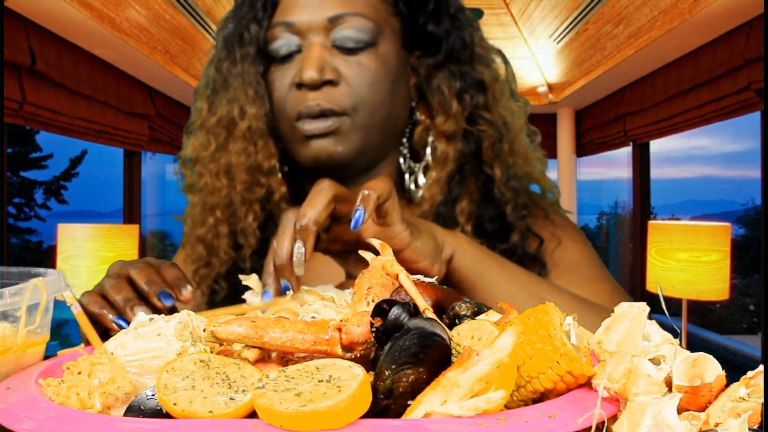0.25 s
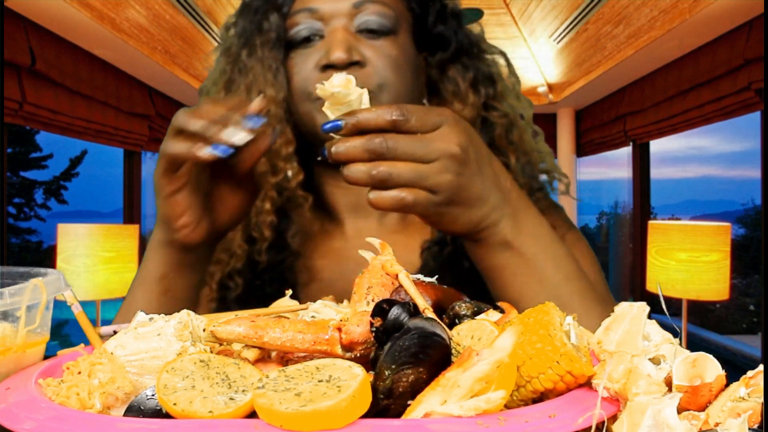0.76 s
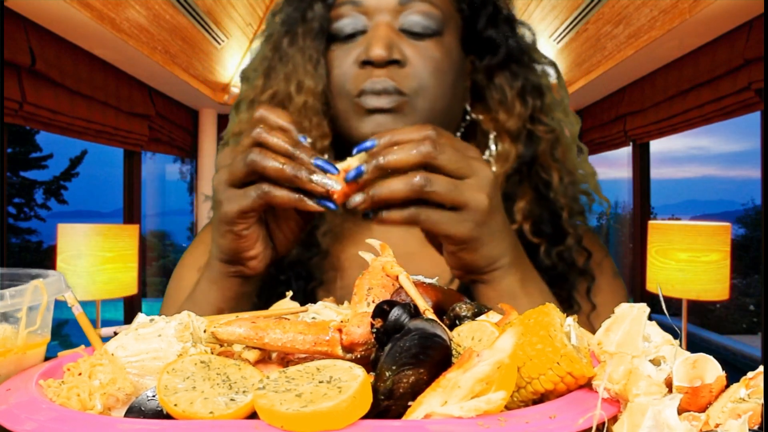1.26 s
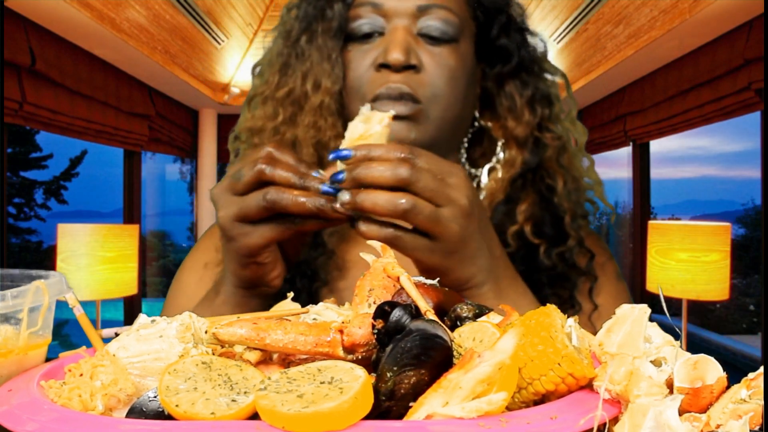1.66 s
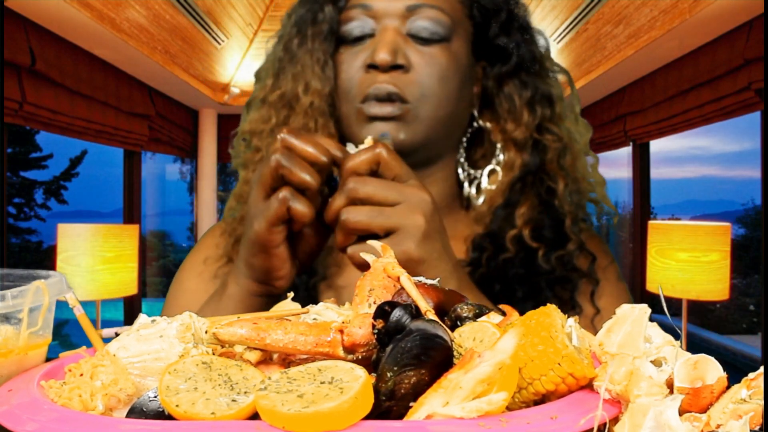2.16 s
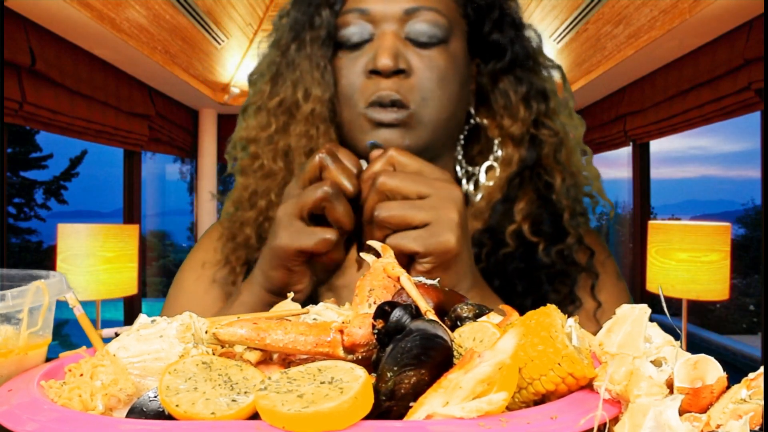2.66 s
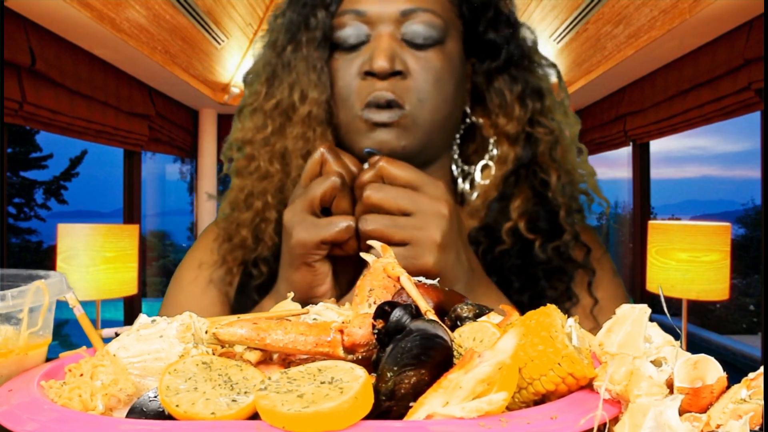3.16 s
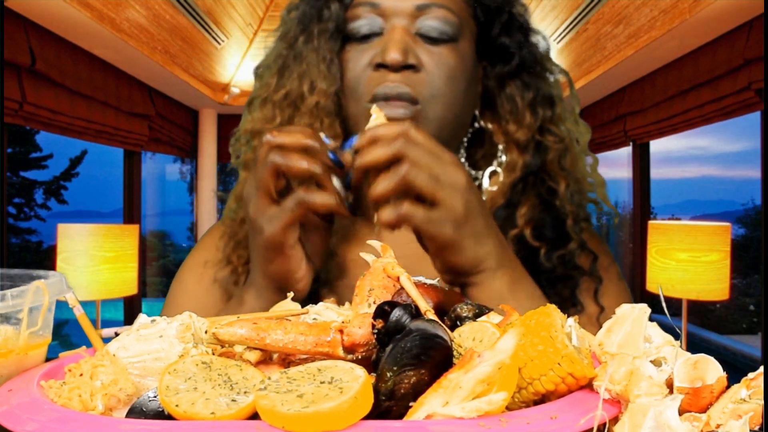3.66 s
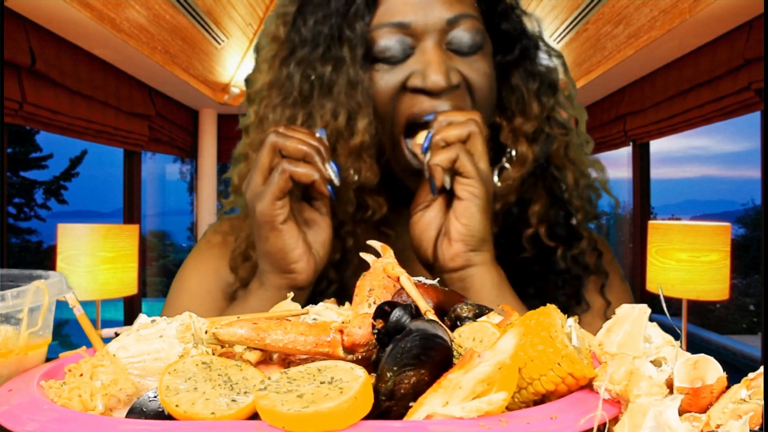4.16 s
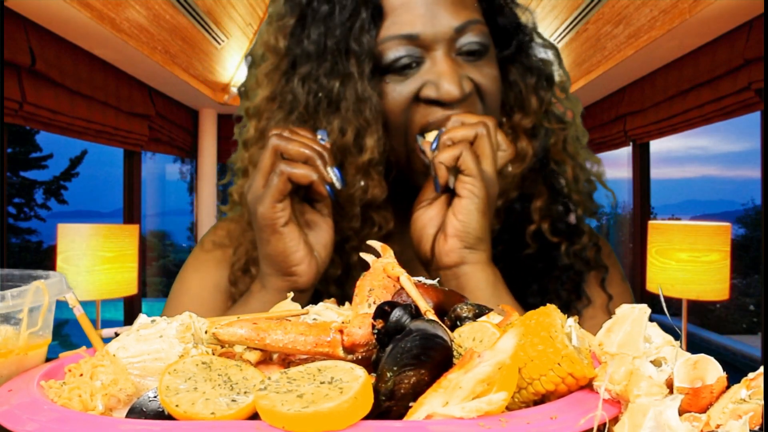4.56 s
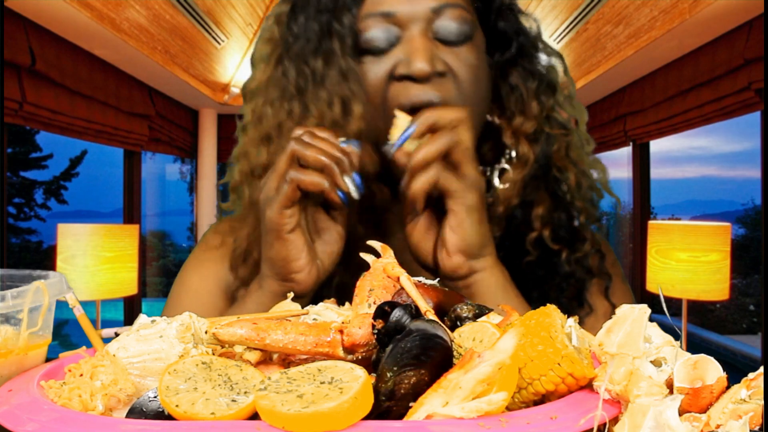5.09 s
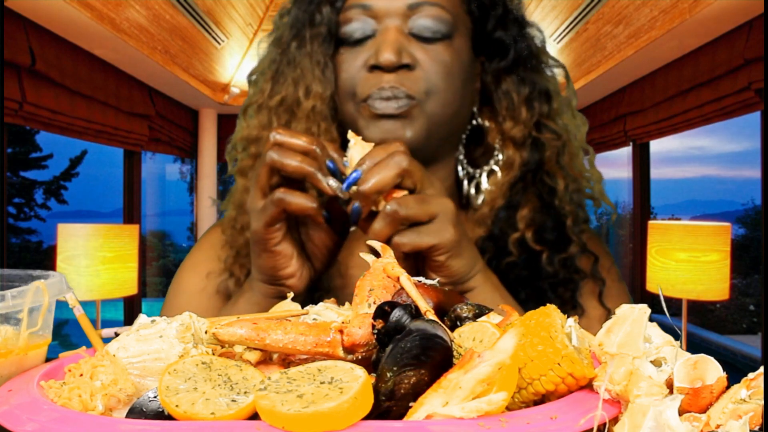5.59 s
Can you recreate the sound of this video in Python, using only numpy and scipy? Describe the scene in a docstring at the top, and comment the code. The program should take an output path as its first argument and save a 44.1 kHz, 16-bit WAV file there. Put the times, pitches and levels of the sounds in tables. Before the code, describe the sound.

Close to the microphone in a lively room, hard shell pieces clatter on a loaded platter, then fingers squeeze and crack hollow crab legs in bright, dry snaps with fine crackle. After a quiet gap come more cracks and tiny wet lip smacks. Teeth then break the shell with a violent, echoing crack, far louder than everything else. Small smacks and faint crackles follow over soft hiss and hum.

```python
"""Crab legs are eaten near a microphone in a live room, over a faint steady hiss and hum.
Shells knock on the platter first, under the crackle of squeezing fingers, which crack hollow legs
throughout; lips smack from 1.4 s on and teeth crunch through the shell from 4.3 s to 4.9 s,
the loudest bite with two strong echoes. Every break is a short run of tiny fractures that rings a
resonant body; each sound also excites a synthetic room of scatter, echoes and a decaying tail."""
import sys
import numpy as np
from scipy import signal
from scipy.fft import rfft, irfft
from scipy.io import wavfile
from scipy.ndimage import uniform_filter1d, minimum_filter1d

SR = 44100
rng = np.random.default_rng(int(sys.argv[2]) if len(sys.argv) > 2 else 0)


def persist_wave(psi):
    """Save psi, clipped to +-1, as 16-bit WAV."""
    counts = np.round(np.clip(psi, -1, 1) * 32767).astype(np.int16)
    wavfile.write(sys.argv[1], SR, np.atleast_2d(counts).T)


N = 257103
TAPS = 4096  # length of forces and body responses, samples
HZ = np.fft.rfftfreq(TAPS, 1 / SR)

# Spectrum of snapping shell. Each row: frequency in Hz, gain in dB.
SNAP_SPECTRUM = [(100, -21.5), (400, -8.5), (900, -11.5), (1400, -8), (2200, -1.5), (3000, -2), (3700, 2.5),
                 (5200, 2), (7000, 0.5), (10000, -5.5), (16000, -16)]


def amp(db):
    """Decibels to amplitude gain."""
    return 10 ** (np.asarray(db) / 20)


def read(points, hz):
    """Reads a table of (Hz, value), joined by straight lines over log frequency."""
    f, value = np.transpose(points)
    return np.interp(np.log(hz + 1), np.log(f + 1), value)


def evened(x):
    """Scales to rms 1."""
    return x / np.sqrt(np.mean(x ** 2) + 1e-20)


def add(mix, start_s, sound):
    """Mixes a sound in at its start time, cut at the end of the mix."""
    start = max(round(start_s * SR), 0)
    part = mix[start:][:len(sound)]
    part += sound[:len(part)]


def causal(gain):
    """Minimum-phase impulse response with this gain over HZ, by folding the cepstrum."""
    cepstrum = irfft(np.log(np.maximum(gain, 1e-5)))
    cepstrum[1:TAPS // 2] *= 2
    cepstrum[TAPS // 2 + 1:] = 0
    return irfft(np.exp(rfft(cepstrum)))


def colour(points):
    """Impulse response of a spectrum table."""
    return causal(amp(read(points, HZ)))


def peak(hz, width_hz):
    """Gain of one resonance over HZ, 1 at its centre."""
    return HZ * width_hz / np.hypot(HZ ** 2 - hz ** 2, HZ * width_hz)


def body(modes):
    """Impulse response of several resonances, summed in power."""
    power = sum((amp(db) * peak(hz, width_hz)) ** 2 for hz, width_hz, db in modes)
    return causal(np.sqrt(power))


def shard(points, hz, rel_width, lift):
    """A broad snap, lifted around the note of the piece that breaks off."""
    return causal(amp(read(points, HZ)) * (1 + lift * peak(hz, rel_width * hz) ** 2))


def fractures(crumble_ms, per_s=2600, follow_per_ms=0.52, burst_ms=0.57, spread_db=4, even_hz=140):
    """A brief tearing burst, then uneven small breaks that swell and die; a longer run weighs more."""
    t_ms = 1000 * np.arange(TAPS) / SR
    crumble_ms = max(crumble_ms, 0.3)
    burst = rng.standard_normal(TAPS) * np.exp(-t_ms / burst_ms)
    sizes = rng.choice([-1, 1], TAPS) * amp(spread_db * rng.standard_normal(TAPS))
    breaks = sizes * (rng.random(TAPS) < per_s / SR)
    run = breaks * np.sqrt(t_ms) * np.exp(-t_ms / crumble_ms)
    force = evened(burst) + follow_per_ms * crumble_ms * evened(run)
    # whiten the force: colour comes from the body that it drives
    power = uniform_filter1d(abs(rfft(force)) ** 2, max(round(even_hz / HZ[1]), 1))
    whitener = causal(np.sqrt(power.mean() / power))
    return signal.fftconvolve(force, whitener)[:TAPS]


def struck(force, response, db):
    """A body driven by a force; db is the level of its energy spread over 10 ms."""
    sound = signal.fftconvolve(force, response)
    return amp(db) * sound / np.linalg.norm(sound) * np.sqrt(SR / 100)


def room(x, tail_db=0, build_ms=4, near_db=-5, near_ms=5, first_per_s=3500, crowd_ms=40):
    """Scatter from hands and table, dull echoes, then crowding reflections whose treble dies first."""
    # Tail spectrum. Each row: frequency in Hz, gain in dB.
    tail_spectrum = [(100, 11.5), (500, 4), (1500, 8), (3000, 1), (5000, 3), (9000, 3), (16000, 2)]
    # Tail decay. Each row: frequency in Hz, time to fall by 60 dB in s.
    decay_times = [(200, 0.45), (700, 0.46), (2500, 0.41), (5000, 0.37), (9000, 0.27), (15000, 0.27)]
    # Echoes from the table and nearby walls. Each row: delay in ms, level in dB.
    echoes = [(3.8, -19), (10.6, -20), (16.5, -17.5)]
    size = SR // 2  # response lasts 0.5 s
    t_ms = 1000 * np.arange(size) / SR

    chance = np.minimum(first_per_s / SR * (1 + (t_ms / crowd_ms) ** 2), 1)
    hits = rng.random(size) < chance
    reflections = rng.standard_normal(size) * hits / np.sqrt(chance)  # even power as density grows
    hz, t, z = signal.stft(reflections, SR, nperseg=256)
    decay_db = 60 * t / read(decay_times, hz)[:, None]
    z = z * amp(read(tail_spectrum, hz)[:, None] - decay_db)
    tail = signal.istft(z, SR, nperseg=256)[1][:size] * (1 - np.exp(-t_ms / build_ms))

    near = rng.standard_normal(size) * np.sqrt(t_ms) * np.exp(-t_ms / near_ms)
    response = amp(tail_db) * tail / np.linalg.norm(tail) + amp(near_db) * near / np.linalg.norm(near)
    for delay_ms, db in echoes:
        add(response, delay_ms / 1000, amp(db) * signal.windows.hann(5))
    return signal.fftconvolve(x, response)


def background(hiss_db=-58.5):
    """Steady room hiss, as shaped noise, and mains hum, as sines of random phase."""
    # Hiss spectrum. Each row: frequency in Hz, relative level in dB.
    hiss_spectrum = [(15, -48), (25, -28), (45, -18), (130, -7), (260, -8.5), (600, -11.5), (1350, -13.5),
                     (3920, -18.5), (16000, -33)]
    # Hum partials. Each row: frequency in Hz, rms level in dB.
    hum_partials = [(60, -79.5), (119.5, -72.5)]
    gain = amp(read(hiss_spectrum, np.fft.rfftfreq(N, 1 / SR)))
    hiss = irfft(rfft(rng.standard_normal(N)) * gain, N)
    t = np.arange(N) / SR
    hum = sum(amp(db) * np.sqrt(2) * np.sin(2 * np.pi * (hz * t + rng.random()))
              for hz, db in hum_partials)
    return amp(hiss_db) * evened(hiss) + hum


def effort(ease_ratio=0.85):
    """How hard the fingers press: every squeeze grows and eases exponentially."""
    # Squeezes of the shell. Each row: hardest moment in s, effort in dB,
    # time constant of the swell in s (easing off takes ease_ratio times as long).
    squeezes = [(.15, -46.5, 0.095), (1.03, -68, 0.055), (1.28, -61, 0.75), (1.745, -44, 0.017),
                (2.155, -49.5, 0.063), (2.59, -52.5, 0.068), (3.46, -61.5, 0.15), (4.04, -60, 0.038),
                (4.32, -67, 0.075), (5.27, -61.5, 0.091), (5.81, -61, 0.069)]
    t = np.arange(N) / SR
    return sum(amp(db) * np.exp(-np.maximum(s - t, (t - s) / ease_ratio) / swell_s)
               for s, db, swell_s in squeezes)


def handling(per_s=1400, size_step_db=-1.5, ring_hz=2450, ring_width_hz=600, ring_db=14,
             trim_db=-4, room_db=2):
    """Tiny fractures of mixed size under the fingers ring the shell, as loud as the effort."""
    sizes = amp(size_step_db * np.minimum(rng.exponential(1, N), 3))
    grains = rng.standard_normal(N) * sizes * (rng.random(N) < per_s / SR)
    ring = amp(ring_db) * peak(ring_hz, ring_width_hz) ** 2
    shell = causal(amp(read(SNAP_SPECTRUM, HZ)) * (1 + ring))
    crackle = evened(signal.oaconvolve(grains, shell)[:N])
    yield 0, crackle * effort() * amp(trim_db), room_db


def splinters(max_per_s=12, full_db=-59, level_db=-65, spread_db=2, snap_hz=6500, crumble_ms=2,
              room_db=0):
    """Faint stray ticks of splintering shell, more frequent while the fingers press."""
    chance = max_per_s / SR * np.minimum(effort() / amp(full_db), 1) ** 2
    sizes = amp(level_db + spread_db * rng.standard_normal(N)) * (rng.random(N) < chance)
    shell = shard(SNAP_SPECTRUM, snap_hz, rel_width=0.8, lift=0.6)
    tick = struck(fractures(crumble_ms), shell, 0)
    yield 0, signal.oaconvolve(sizes, tick)[:N], room_db


def knocks(thud_trim_db=-1, platter_trim_db=-2, click_trim_db=-2, thud_rel_width=0.71, room_db=1):
    """A shell lands: its own dull note, the platter under it and a hard click."""
    # Each row: start in s, thud level in dB, thud frequency in Hz, platter level in dB,
    # click level in dB, scrape time constant in ms; levels before the trims.
    landings = [(.0035, -34.5, 1520, -39.5, -34.5, 1.35), (0.0357, -34, 930, -29.5, -26, 0.91),
                (0.117, -40, 1390, -39, -55, 4.5), (.176, -39.5, 520, -32.5, -43, 3.6),
                (.188, -35, 2500, -34.5, -51, 2.5), (.198, -39.5, 424, -42, -51, 1.3),
                (.245, -27.5, 1064, -27, -37.5, 2.5), (.27, -35.5, 2150, -49, -50, 6.9),
                (0.3125, -34.5, 2130, -47, -40, 0.98), (.367, -46, 525, -43, -67, 3.3)]
    # Resonances of the loaded platter. Each row: frequency in Hz, width in Hz, level in dB.
    platter_modes = [(420, 74, -0.5), (553, 38, 6), (750, 130, -26), (1070, 150, 0.5), (1300, 170, -3),
                     (1670, 150, 0), (2130, 185, 5), (3330, 270, -4)]
    # Each row: frequency in Hz, gain in dB.
    click_spectrum = [(100, -20), (350, 2), (1500, 2), (3000, 9), (5000, 0.5), (8500, -1), (11000, -11.5),
                      (16000, -25)]
    platter, hard = body(platter_modes), colour(click_spectrum)
    for s, thud_db, thud_hz, platter_db, click_db, scrape_ms in landings:
        shell = causal(peak(thud_hz, thud_rel_width * thud_hz) ** 2)
        thud = struck(fractures(scrape_ms), shell, thud_db + thud_trim_db)
        ring = struck(fractures(scrape_ms), platter, platter_db + platter_trim_db)
        click = struck(fractures(scrape_ms), hard, click_db + click_trim_db)
        yield s, thud + ring + click, room_db


def cracks(low_hz=1500, ring_stretch=0.73, snap_stretch=0.62, overtone=1.44, overtone_db=-12,
           ring_room_db=0, snap_room_db=-1):
    """Shell splits with a bright snap; the hollow leg rings two notes, the thin tube has little bass."""
    # Each row: start in s, ring level in dB, ring frequency in Hz, width of its resonance in Hz
    # (before squaring), snap level in dB, snap frequency in Hz, crumble time in ms (before the stretches).
    splits = [(0.151, -34, 2560, 650, -41.5, 3600, 2.9), (0.4774, -49.5, 2400, 500, -53.5, 4500, 6.2),
              (0.9673, -53.5, 2510, 500, -58.5, 7000, 6.6), (1.0352, -46, 2290, 510, -60, 4140, 3.5),
              (1.052, -51, 2050, 500, -52.5, 4940, 6.6), (1.1413, -49.5, 2550, 500, -53, 4530, 3),
              (1.1972, -43.5, 2430, 810, -57, 3600, 15), (1.3302, -52, 2830, 500, -58, 6900, 1.5),
              (1.656, -61, 2420, 500, -56.5, 6000, 1.5), (1.6813, -48.5, 2550, 400, -47, 7500, 1.7),
              (1.744, -38.5, 2430, 380, -66, 6540, 2.3), (1.77, -33, 2660, 380, -33.5, 4770, 5),
              (1.8538, -45, 2360, 900, -41, 5600, 4.5), (2.0368, -51.5, 2540, 500, -52, 4170, 3.6),
              (2.166, -39.5, 2200, 1090, -42.5, 4500, 8), (2.193, -42, 2570, 1100, -48, 4530, 6.9),
              (2.5667, -45.5, 2010, 900, -50.5, 6900, 10), (2.5992, -45.5, 2210, 1000, -56, 3650, 8.7),
              (3.3417, -47.5, 2320, 500, -54, 3670, 15), (3.379, -35, 2220, 630, -52, 3200, 4.2),
              (3.498, -41.5, 2310, 700, -51, 3640, 7.6), (3.5245, -38.5, 2520, 780, -42.5, 4700, 3),
              (5.2193, -53, 2330, 900, -56, 3500, 12), (5.3367, -52, 2220, 500, -62, 3500, 4.5),
              (5.508, -55, 2700, 500, -55.5, 6000, 4.7), (5.764, -58.5, 2420, 900, -55, 3500, 7.4)]
    low_cut = signal.butter(2, low_hz, "high", fs=SR, output="sos")
    for s, ring_db, ring_hz, width_hz, snap_db, snap_hz, crumble_ms in splits:
        notes = peak(ring_hz, width_hz) ** 2
        notes = notes + amp(overtone_db) * peak(overtone * ring_hz, width_hz) ** 2
        leg = signal.sosfilt(low_cut, causal(notes))
        ring_force = fractures(ring_stretch * crumble_ms, follow_per_ms=0.31)
        yield s, struck(ring_force, leg, ring_db), ring_room_db
        edge = shard(SNAP_SPECTRUM, snap_hz, rel_width=0.23, lift=0.94)
        snap_force = fractures(snap_stretch * crumble_ms, burst_ms=0.95)
        yield s, struck(snap_force, edge, snap_db), snap_room_db


def smacks(trim_db=-1, film_ms=0.8, room_db=-2):
    """A wet film of lips and meat bursts and rings the pocket of air behind it."""
    # Each row: start in s, level in dB (before the trim), centre in Hz,
    # width of the resonance in Hz (before squaring).
    bursts = [(1.423, -55.5, 6600, 6900), (1.434, -63, 9250, 600), (3.6652, -56, 11000, 1810),
              (3.756, -58, 4900, 6000), (3.76, -46, 845, 332), (3.762, -51, 516, 220),
              (4.02, -60, 4630, 3000), (4.036, -62, 9000, 9000), (4.122, -57.5, 8750, 4000),
              (5.1851, -51.5, 6600, 7000), (5.402, -54, 5000, 6000), (5.4127, -48.5, 8770, 1000),
              (5.447, -57, 410, 81), (5.6598, -41.5, 4860, 6020), (5.6598, -49.5, 8800, 695)]
    for s, db, hz, width_hz in bursts:
        force = fractures(film_ms, burst_ms=0.21)
        pocket = causal(peak(hz, width_hz) ** 2)
        yield s, struck(force, pocket, db + trim_db), room_db


def bites(crunch_trim_db=-1, snap_trim_db=-1, low_hz=1120, high_hz=5000, crunch_room_db=1.5,
          snap_room_db=-3):
    """Shell breaks between teeth, snap beamed forward, crunch spread out; two rows are echoes of a bite."""
    # Each row: start in s, crunch level in dB, snap level in dB, snap frequency in Hz,
    # crumble time constant in ms; levels before the trims.
    # The rows at 4.776 s and 4.782 s are echoes of the loudest bite, made like the bites.
    bites_and_echoes = [(4.305, -63, -70, 3200, 3), (4.35, -49, -72, 3200, 7.5),
                        (4.364, -49, -50.5, 5130, 3), (4.62, -60, -46.5, 4250, 3.8),
                        (4.6747, -30.5, -21.5, 5080, 2.9), (4.7651, -14, -15, 4900, 0.85),
                        (4.766, -25, -22, 9900, 0.39), (4.776, -18.5, -18, 3400, 0.4),
                        (4.782, -21, -30, 3400, 1.8), (4.849, -43, -34.5, 9000, .7),
                        (4.866, -30.5, -22.5, 8230, 1.7)]
    # Shell held in the open mouth. Each row: frequency in Hz, width in Hz, level in dB.
    mouth_modes = [(1392, 134, -7.5), (2110, 120, -4), (2746, 320, 3), (3320, 270, -0.5)]
    # Each row: frequency in Hz, gain in dB.
    bite_spectrum = [(60, -25), (300, -17), (900, -6.5), (1400, -31), (2200, 5), (3800, 11), (6200, 9.5),
                     (9000, 7), (11500, 3), (16000, -5.5)]
    low_cut = signal.butter(4, low_hz, "high", fs=SR, output="sos")
    high_cut = signal.butter(1, high_hz, "low", fs=SR, output="sos")
    mouth = signal.sosfilt(high_cut, signal.sosfilt(low_cut, body(mouth_modes)))
    for s, crunch_db, snap_db, snap_hz, crumble_ms in bites_and_echoes:
        crunch_force = fractures(crumble_ms, follow_per_ms=0.29)
        yield s, struck(crunch_force, mouth, crunch_db + crunch_trim_db), crunch_room_db
        edge = shard(bite_spectrum, snap_hz, rel_width=0.17, lift=1.6)
        snap_force = fractures(crumble_ms, follow_per_ms=0.43, burst_ms=0.51)
        yield s, struck(snap_force, edge, snap_db + snap_trim_db), snap_room_db


def scene():
    """Every sound arrives directly and through the room; each leaves in a new direction: new reflections."""
    mix = background()
    for source in (handling(), splinters(), knocks(), cracks(), smacks(), bites()):
        for start_s, sound, room_db in source:
            add(mix, start_s, sound)
            add(mix, start_s, amp(room_db) * room(sound))
    return mix[None]


def record(dry, ceiling=0.78, edge_hz=16400):
    """A fast look-ahead limiter holds peaks under the ceiling; a steep low-pass then limits the band."""
    allowed = np.minimum(1, ceiling / (abs(dry) + 1e-9))
    gain = uniform_filter1d(minimum_filter1d(allowed, size=41), size=41)
    low_pass = signal.firwin(511, edge_hz, window=("kaiser", 9), fs=SR)
    return signal.oaconvolve(dry * gain, low_pass[None], "same")


dry = scene()
out = record(dry)
persist_wave(out)
```